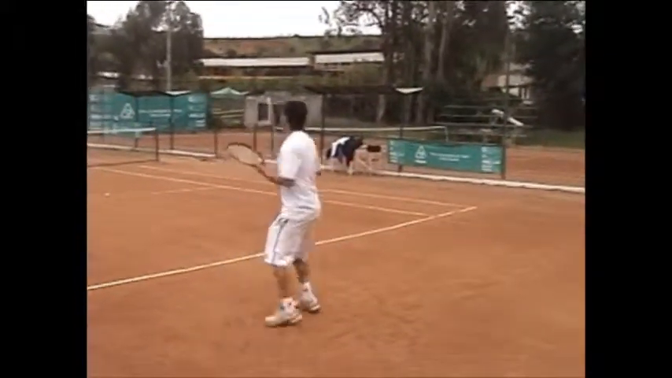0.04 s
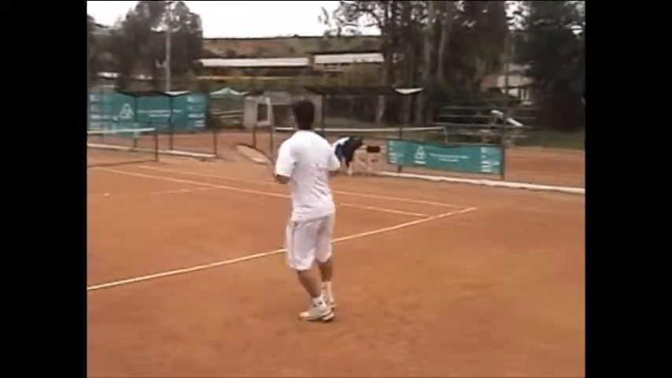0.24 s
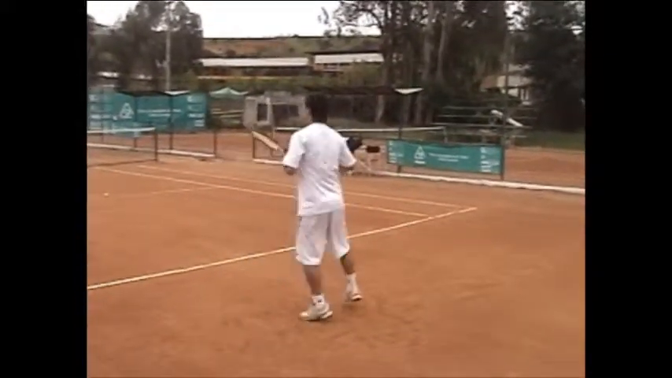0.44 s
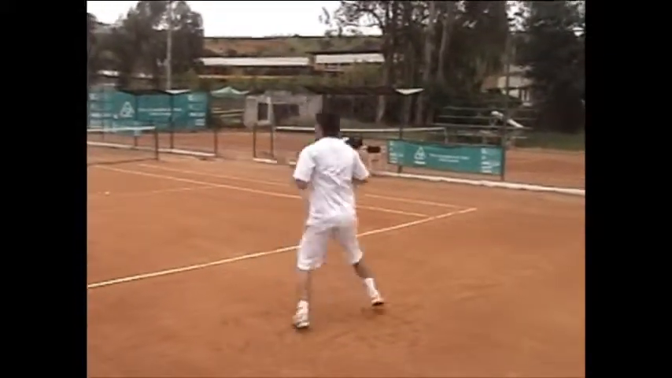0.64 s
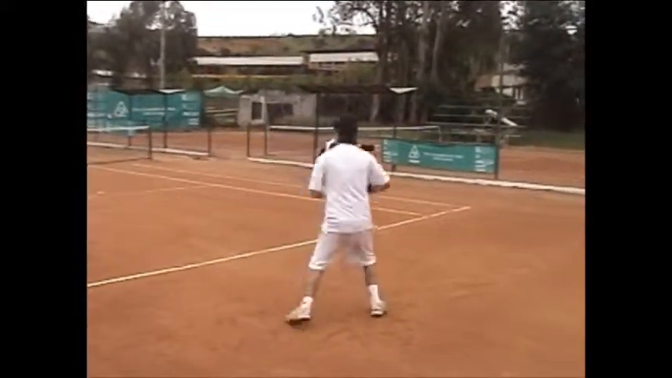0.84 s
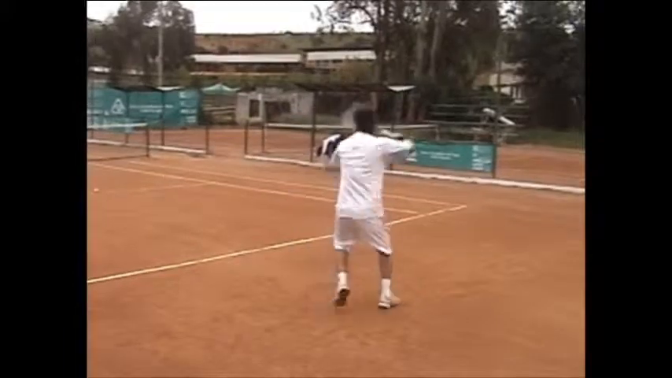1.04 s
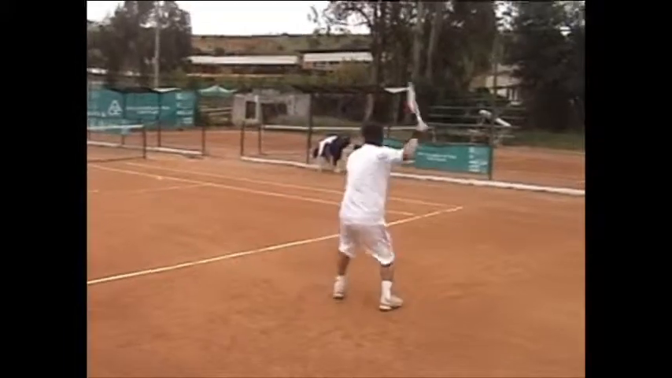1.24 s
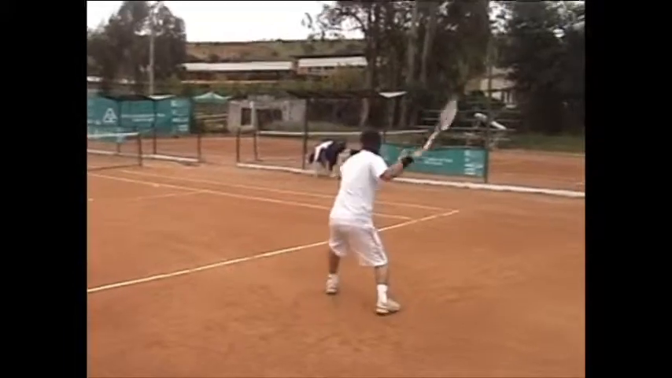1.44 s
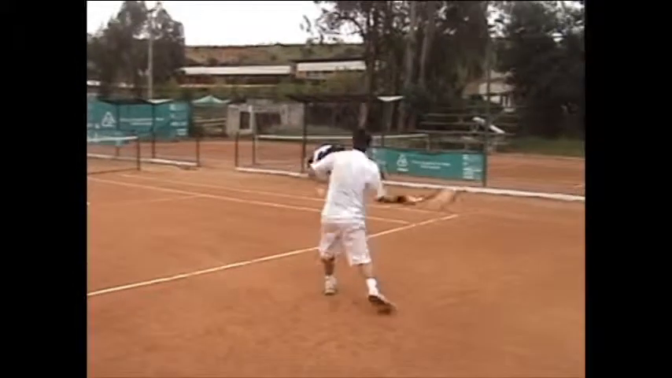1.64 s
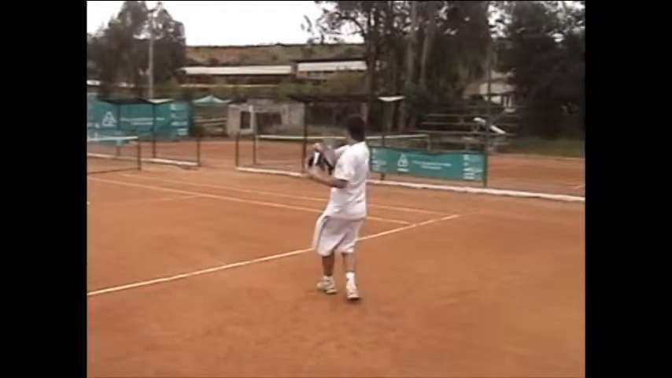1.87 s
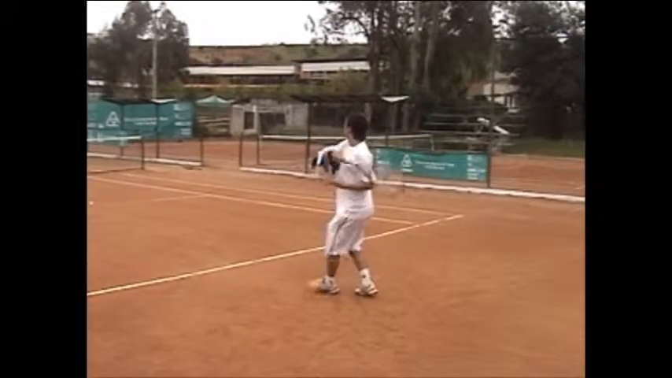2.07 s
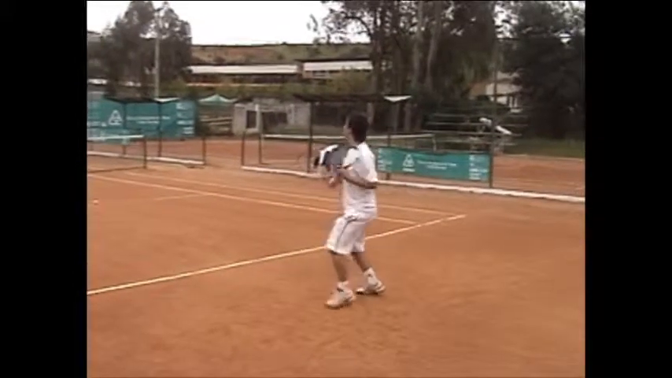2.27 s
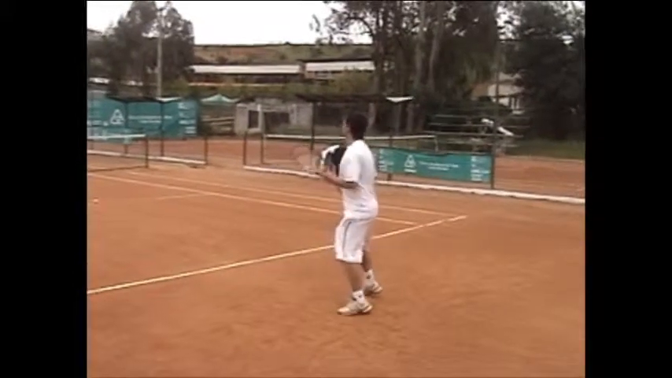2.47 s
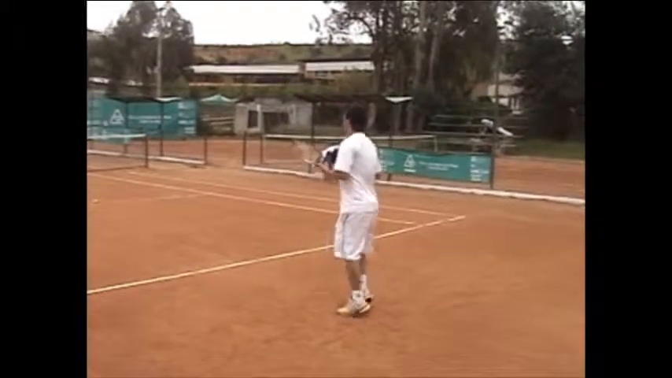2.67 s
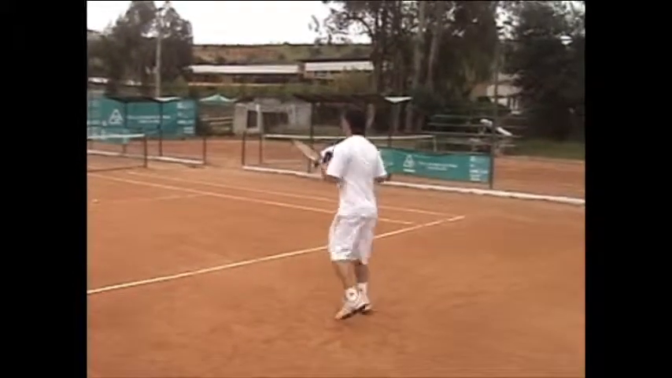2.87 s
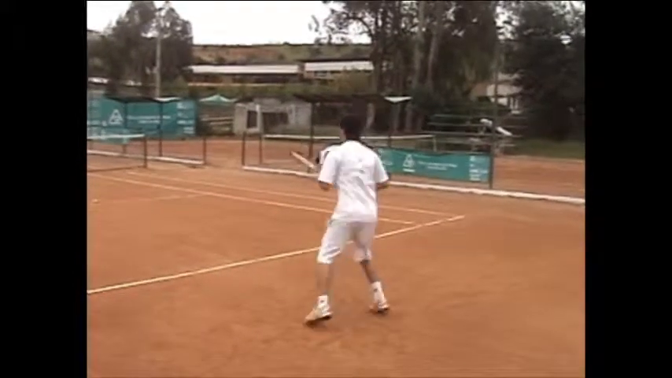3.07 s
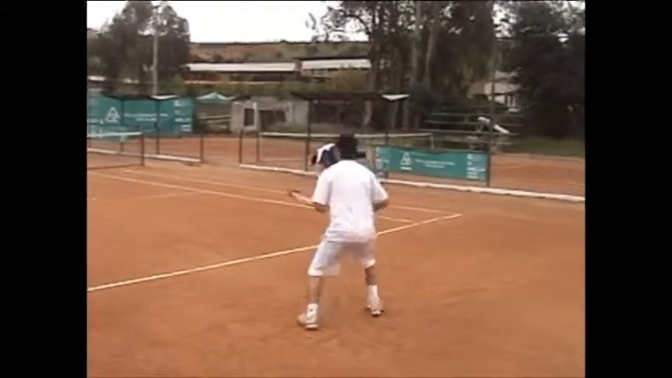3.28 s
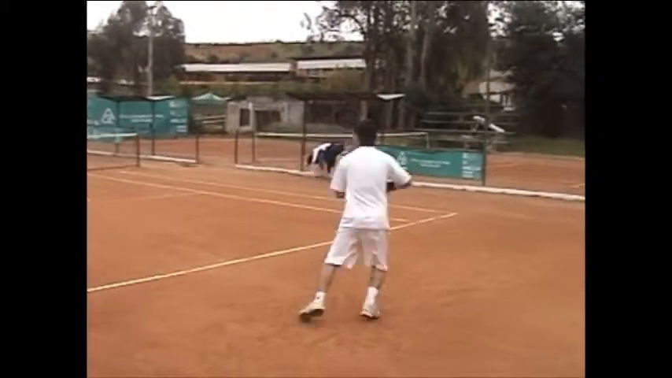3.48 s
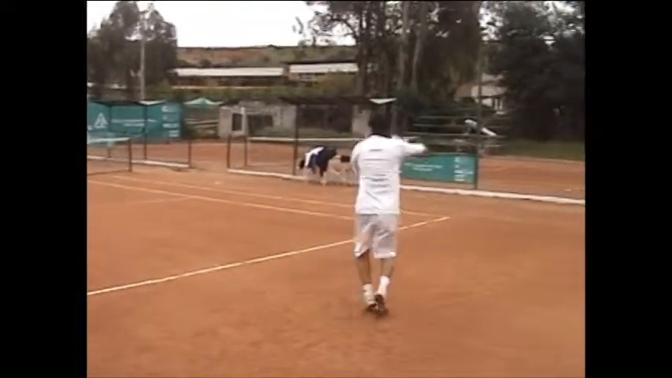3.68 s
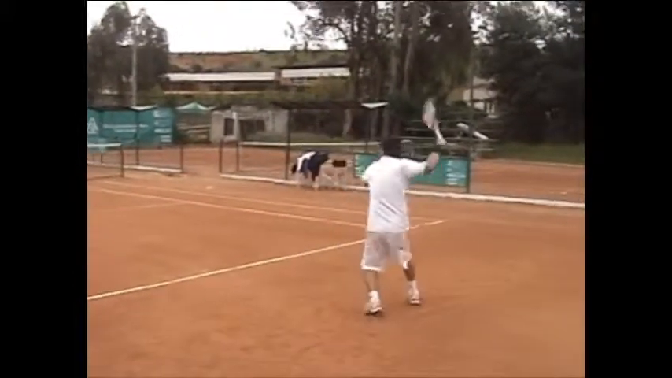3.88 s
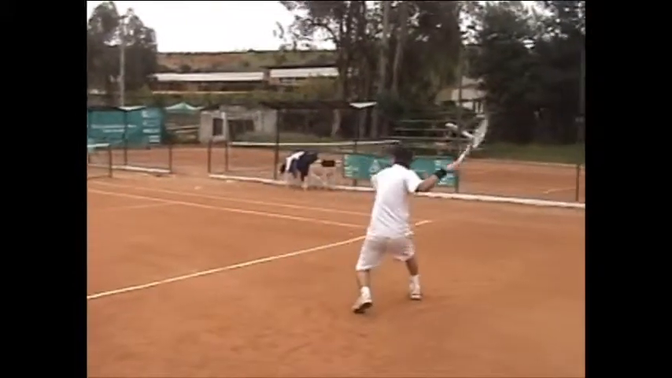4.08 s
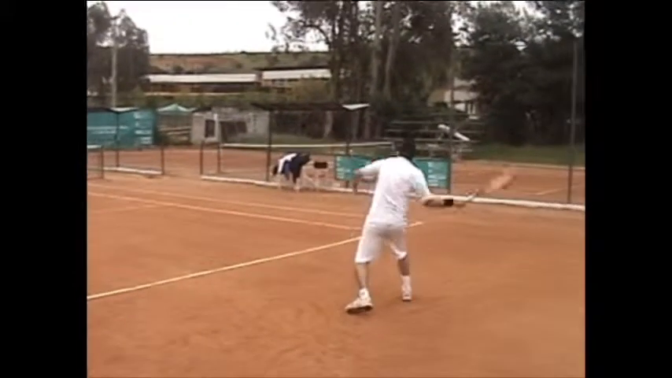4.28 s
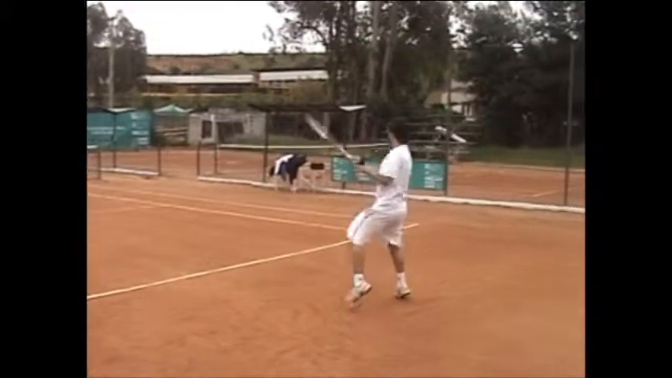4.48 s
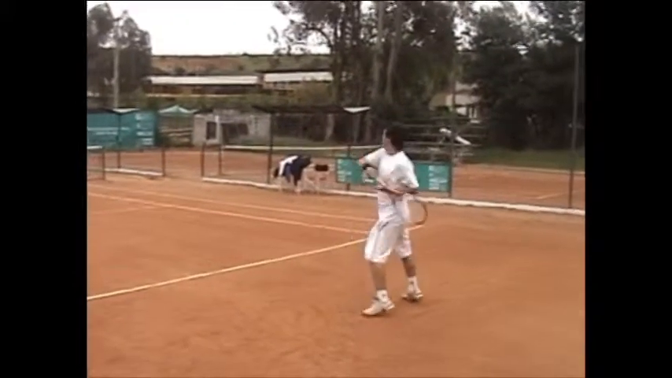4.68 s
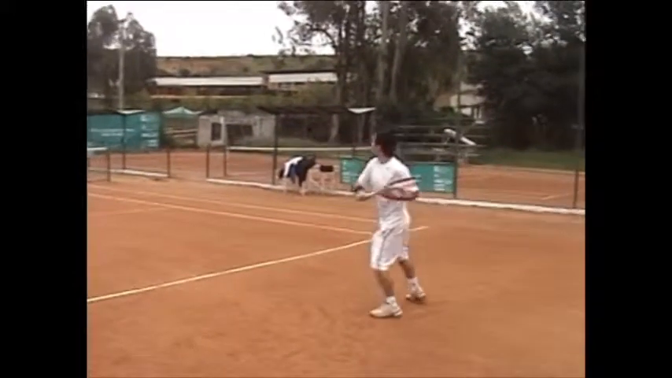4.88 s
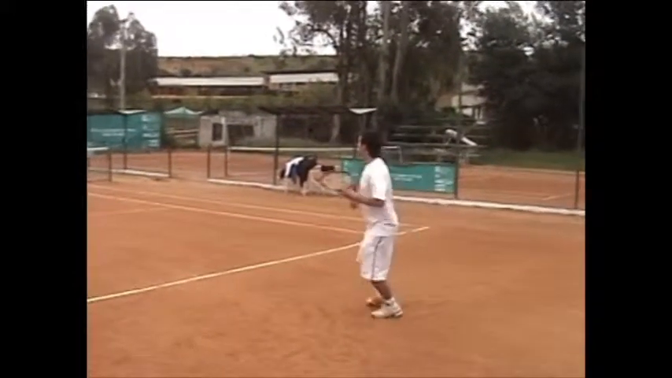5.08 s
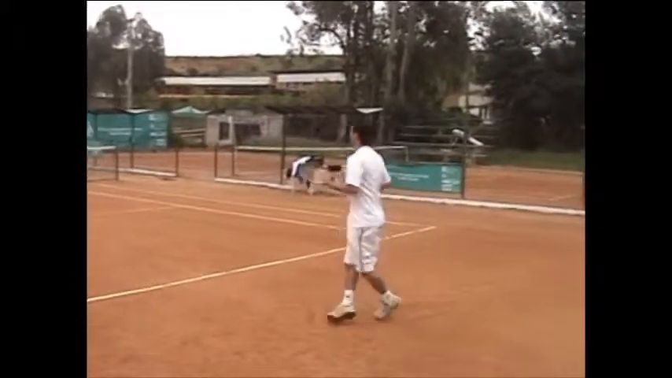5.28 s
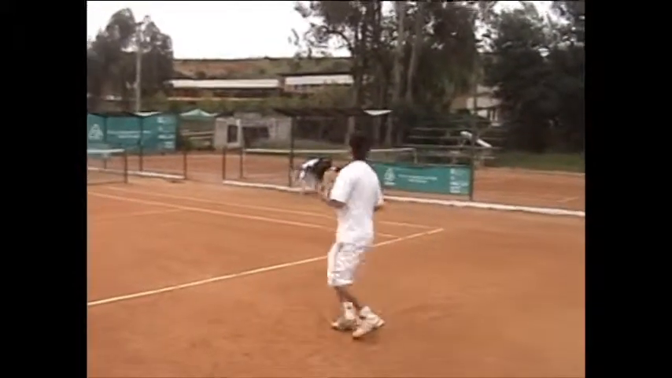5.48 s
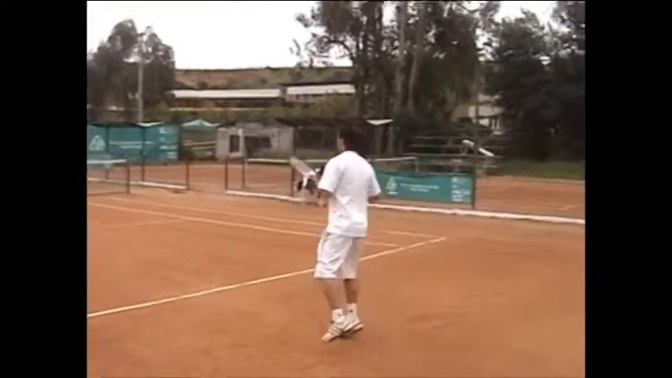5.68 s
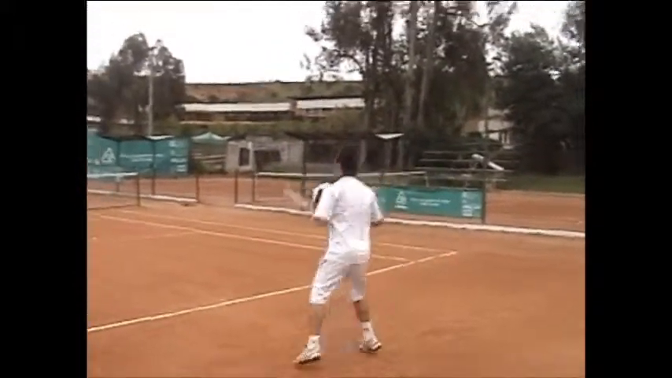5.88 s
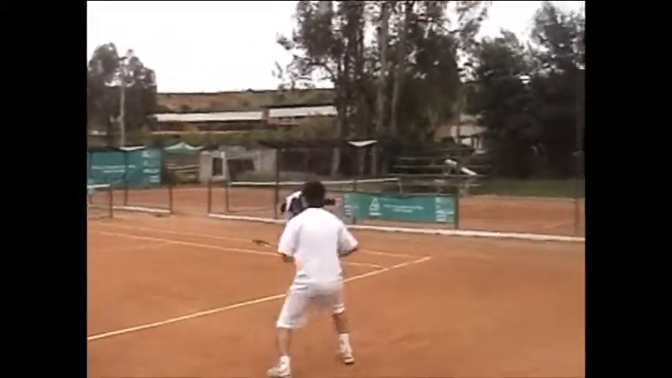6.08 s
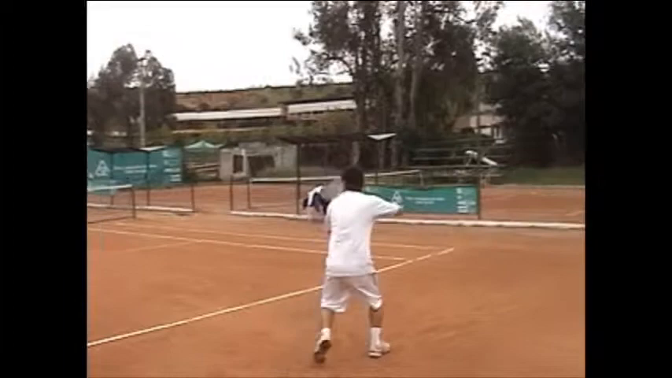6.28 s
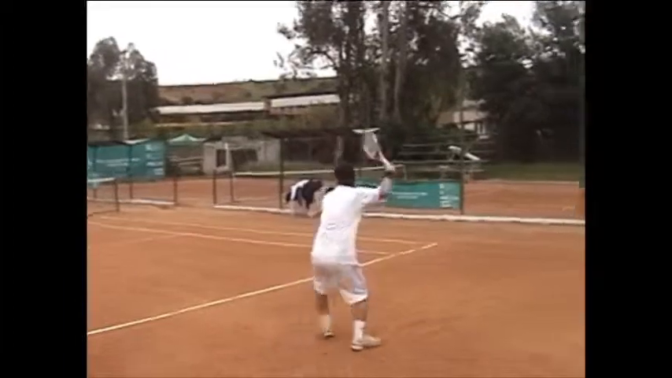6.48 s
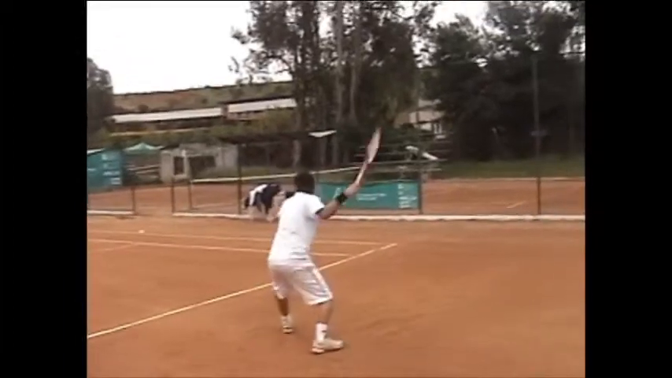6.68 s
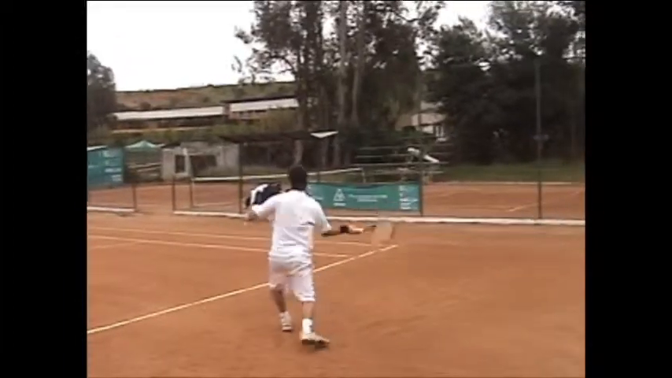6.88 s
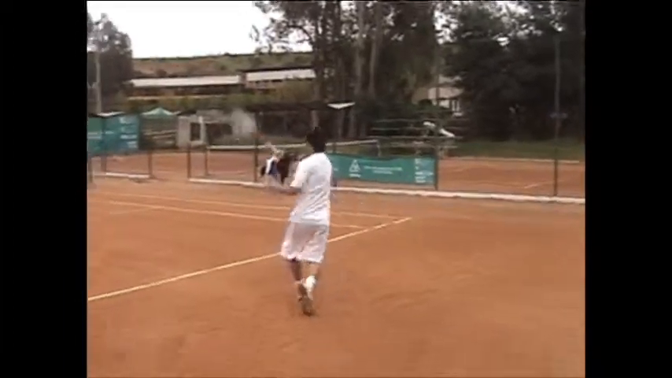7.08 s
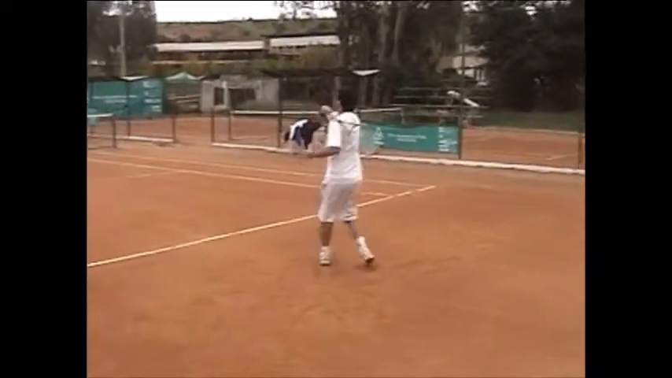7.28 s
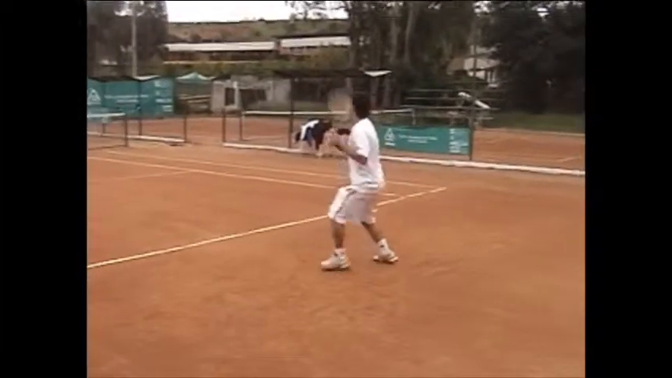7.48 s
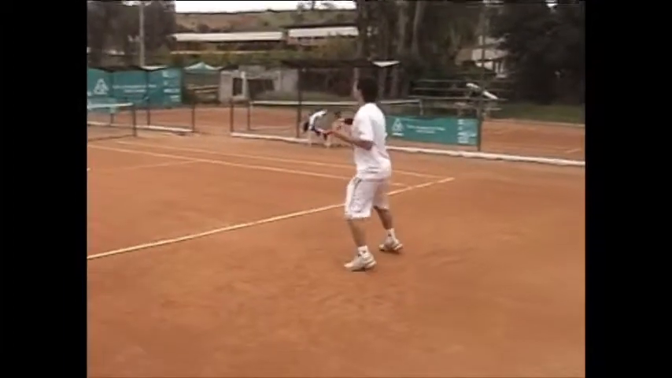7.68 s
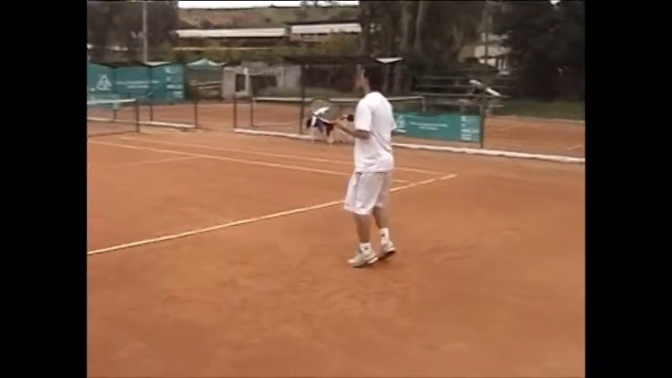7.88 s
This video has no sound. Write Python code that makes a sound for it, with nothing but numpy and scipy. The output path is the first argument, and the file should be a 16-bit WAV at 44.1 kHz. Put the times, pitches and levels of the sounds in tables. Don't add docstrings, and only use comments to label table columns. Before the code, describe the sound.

Open outdoor clay court, small stereo microphone behind the near player. Faint traffic hum, leaf rustle and slight wind run throughout; thin high bird chirps come from one side at 0.3-1.5 s. A far racket knocks at 0.6 s, short and woody with fence echo; the ball bounces and shoes scuff and crunch at 0.7-1.7. The near racket answers at 1.9 s, much louder, a hollow pop with crack, ringing strings and quick slap returns, over a bright gritty slide. Small steps and stone ticks follow. The softest far hit comes at 3.1, a scraping slide around 4.0, a near hit at 4.55. From 4.9 to 6 the bird sings louder, with a buzzy trill near 5.2. The hardest far hit lands at 5.9, then thuds, sharp stone clicks and sliding shoes around 6.6, and the strongest near hit at 7.1. Light footfalls and grit trail to about 8 s.

```python
import sys
import numpy as np
from scipy import signal
from scipy.fft import rfft, irfft
from scipy.io import wavfile
from scipy.ndimage import map_coordinates

SR = 44100
rng = np.random.default_rng(int(sys.argv[2]) if len(sys.argv) > 2 else 0)


def natural_amplitude(level_db):
    exponent = np.asarray(level_db, float) / 20
    return 10 ** exponent


def generate_wav(sig):
    pcm = np.round(np.clip(np.atleast_2d(sig).T, -1, 1) * 32767).astype(np.int16)
    wavfile.write(sys.argv[1], SR, pcm)


N = 349713

# (frequency [Hz], density [dB per Hz])
AIR_SPECTRUM = [(53, -32), (90, -16.5), (157, 0), (191, -7), (245, -2), (307, -8), (372, -11.5),
                (550, -11), (1000, -13.5), (1470, -16.5), (2420, -21.5), (5500, -25.5), (9600, -36),
                   (11000, -48.5), (14000, -47)]
# (frequency [Hz], correlation [0..1])
LIKENESS = [(60, 0.5), (180, 1), (540, 0.54), (1640, 0.38), (4950, 0.47), (14900, 0.75)]
# (frequency [Hz], density [dB per Hz])
WIND_SPECTRUM = [(20, -44), (35, -18), (49, 0), (62, -11), (90, -12), (130, -30), (300, -90)]
# (time [s], level [dB])
GUSTS = [(0.0, -52), (0.17, -59), (0.79, -58), (1.92, -63), (2.32, -56.5), (3.2, -52), (3.82, -61),
         (4.17, -52), (5.54, -59), (6.1, -55), (6.54, -48), (6.67, -58), (7.09, -51), (7.93, -57)]
TRAFFIC_DB = -41

# (start [s], level [dB])
PHRASES = [
    (0.345, 2),
    (4.879, 3),
]
# (offset [s], length [s], start [Hz], middle [Hz], end [Hz])
MOTIF = [
    (0, .05, 5350, 5800, 6550),
    (.004, .034, 6850, 7150, 7650),
    (.048, .042, 5150, 5600, 5950),
    (.088, .015, 5950, 5750, 5050),
]
MOTIF_DB, MOTIF_GAP_S, REPEAT_DB, REPEAT_RISE = [-58, -60, -55, -52], .152, 2.1, 1.045
# (middle [Hz], swing [Hz], level [dB])
TRILL = (3150, 380, -48.5)
TRILL_S, TRILL_PER_S, TRILL_STROKE_S, TRILL_CLIMB_HZ = 5.181, 72, .009, 10
# (offset [s], length [s], start [Hz], middle [Hz], end [Hz])
ARCH = [
    (-.004, .007, 3700, 4000, 4400),
    (.006, .012, 3150, 3900, 4550),
    (.023, .012, 4550, 3800, 2950),
]
ARCH_DB = [-6, 0, 1]
ARCH_RUNS, ARCH_SPACING_S = [(.934, -49), (5.498, -46)], .0568
LEVEL, ARCHED, DROP, PLUNGE = (1, 1, 1), (.66, 1, .69), (1.12, 1, .85), (1.32, 1, .84)
CREST, FALL, RISE, HOOK = (.93, 1, .82), (1.17, 1, .8), (.96, 1, 1.04), (.8, 1, .78)
# (time [s], length [s], middle [Hz], level [dB], shape)
NOTES = [(.148, .033, 2000, -53, LEVEL), (.876, .032, 5780, -45, PLUNGE), (1.399, .033, 5700, -37, PLUNGE),
         (.907, .05, 4900, -53, LEVEL), (1.43, .066, 4850, -47, LEVEL), (2.21, .06, 4900, -55, ARCHED),
         (4.952, .038, 3100, -50, FALL), (4.978, .21, 1455, -53, LEVEL), (5.569, .115, 1240, -48.5, LEVEL),
         (5.104, .022, 3800, -53, HOOK), (5.17, .008, 4500, -49, HOOK), (5.112, .024, 4250, -55, LEVEL),
         (5.088, .013, 2550, -52, RISE), (5.035, .016, 4300, -55, RISE), (1.344, .02, 3400, -44, RISE),
         (5.066, .02, 5000, -55, RISE), (5.104, .037, 6380, -49, CREST), (5.777, .035, 2550, -55, PLUNGE),
         (5.386, .034, 5680, -42, PLUNGE), (5.834, .014, 4300, -46, CREST), (5.87, .02, 3050, -52, CREST),
         (5.782, .01, 4150, -53, RISE), (.655, .008, 4100, -44, CREST), (.575, .04, 6450, -50, RISE),
         (5.964, .029, 5750, -40, PLUNGE), (5.99, .035, 4800, -48, LEVEL)]

# (time [s], length [s], hiss [dB], change along slide [dB], body over hiss [dB])
SLIDES = [(1.33, 0.058, -43, 3.5, 13), (1.478, 0.16, -47, 3.5, 13), (1.611, 0.12, -36, 0.5, -1),
          (1.976, 0.15, -34.5, -4, 1.5), (1.241, 0.033, -35, -1, 8), (0.725, 0.057, -46, -4, 7),
          (3.245, 0.016, -38.5, 2, 2), (6.48, 0.12, -38, -0.5, -5), (3.291, 0.044, -51.5, 6.5, 3.5),
          (3.924, 0.02, -38, 3.5, 4), (3.949, 0.031, -32, -2, 9), (3.991, 0.16, -29.5, -4, 6),
          (4.741, 0.063, -41.5, -1.5, -10), (5.93, 0.1, -42.5, -7.5, 6), (6.086, 0.053, -45.5, 3.5, 5),
          (6.164, 0.12, -49, 1.5, 5), (6.625, 0.35, -43.5, -8, 5), (7.055, 0.055, -47.5, 6, -3),
          (1.828, .048, -49, 3, -3), (4.163, .02, -42, -5, -3), (4.47, 0.085, -56, 9, -10),
          (7.472, 0.02, -35, 3, -9), (7.717, 0.071, -40.5, -3.5, 4), (7.804, 0.11, -61, 9.5, 15.5)]
# (time [s], length [s], hiss [dB], body over hiss [dB])
LANDINGS = [(0.292, 0.029, -37, -6), (0.71, 0.12, -39.5, 9.5), (1.162, 0.021, -29.5, 7),
            (1.171, 0.076, -29.5, 5), (1.282, 0.094, -40, 12.5), (2.146, 0.077, -43.5, 3),
            (3.211, 0.0088, -32.5, -4), (1.404, 0.061, -37.5, 11.5), (1.901, 0.084, -25, 4),
            (2.493, 0.04, -37.5, 1.5), (2.818, 0.029, -44.5, 5), (3.532, 0.018, -29.5, -1.5),
            (3.734, 0.037, -46, -19), (3.842, 0.15, -42, -3.5), (4.638, 0.04, -45, 8.5),
            (5.426, 0.057, -37, 4.5), (6.046, 0.033, -35, -2), (6.257, 0.06, -39, -11),
            (6.515, 0.058, -33, -12), (7.183, 0.038, -38, -7), (7.501, 0.073, -43.5, 2.5)]
# (time [s], length [s], hiss at end [dB], body over hiss [dB])
PUSHES = [(0.984, 0.06, -39, -21), (1.087, 0.0096, -32.5, -5), (1.764, 0.053, -36, -22),
          (1.78, 0.013, -42, -20), (3.209, 0.03, -54, 14), (3.373, 0.032, -40, -17),
          (3.569, 0.066, -42, -9), (6.353, 0.04, -39, -21), (6.437, 0.033, -45, -6),
          (6.825, 0.12, -43.5, 7.5), (6.939, 0.11, -34.5, -31), (6.94, 0.037, -36, -25),
          (7.381, 0.08, -43, 2)]
LANDING_FADE_DB, PUSH_SWELL_DB = -11, 11.5
CONTACT_S, LIFT_S, PUSH_LIFT_S = 0.0058, 0.024, 0.009
# (frequency [Hz], density [dB per Hz])
GRIT_SPECTRUM = [(1180, -1.5), (2000, 0.5), (2910, -4.5), (3600, 2), (9600, -9), (10800, -24.5),
                 (13600, -21), (14600, -44)]
# (frequency [Hz], density [dB per Hz])
SCRAPE_SPECTRUM = [(200, -29), (330, -9.5), (480, -2), (840, -4), (1600, -4.5), (2700, -10), (5500, -21.5),
                   (9000, -49)]
# (time [s], centre [Hz])
SOLE = [
    [(0.71, 660), (0.735, 1500), (0.774, 905), (0.8, 670), (0.83, 666)],
    [(1.16, 1430), (1.214, 1060), (1.276, 1490), (1.322, 870), (1.396, 670), (1.646, 900), (1.75, 1220)],
    [(1.93, 771), (1.942, 811), (1.968, 1150), (2.036, 1100), (2.068, 977), (2.116, 1120), (2.17, 771)],
    [(3.93, 1560), (4.0, 940), (4.018, 900), (4.054, 1010), (4.09, 880), (4.17, 1050)],
    [(6.46, 795), (6.528, 1500), (6.576, 788), (6.706, 880), (6.752, 788), (6.86, 1140), (6.95, 1050)],
]
SOLE_BANDS_HZ, SOLE_FOCUS_DB = [600, 805, 1190, 1750], 4.5
CLUMP_DB = 3.2

# (time [s], force [dB], strings [dB], side fence [dB], left-right [dB])
FAR_BLOWS = [
    (.5952, -4.5, -17.5, 9, 5.2),
    (3.1287, -5.5, -20.5, -10, 6.4),
    (5.9114, -2, -14, -14, 5.3),
]
# (time [s], force [dB], strings [dB], side fence [dB], left-right [dB])
NEAR_BLOWS = [
    (1.8806, -5, -21.5, -6.5, 2.5),
    (4.5506, -4, -20, -26, 1.5),
    (7.1087, -2.5, -16.5, -8, 3),
]
# (frequency [Hz], t60 [s], delay after contact [s])
FAR_MODES = [(867, 0.017, 0.00305), (1494, 0.034, 0.00357), (2870, 0.016, 0.00146), (996, 0.054, 0.00378),
             (784, .02, 0.0071)]
# (frequency [Hz], t60 [s], delay after contact [s])
NEAR_MODES = [(820, 0.026, 0.00118), (1643, 0.084, 0.0092), (1663, 0.16, 0.014), (1050, 0.059, 0.0027),
              (1613, 0.17, 0.0083)]
# (frequency [Hz], t60 [s], level re ball push [dB])
LESSER_MODES = [(268, 0.042, -7.5), (470, 0.039, -22), (595, 0.018, -0.5), (1055, 0.024, -6),
                (1235, 0.038, -22), (2170, 0.0019, 12.5), (3530, 0.028, -22)]
# (frequency [Hz], delay [s], level re frame [dB])
FAR_REBOUNDS = [(276, 0.0014, -10), (700, 0.0041, -3), (232, 0.00076, -11.5)]
# (frequency [Hz], delay [s], level re frame [dB])
NEAR_REBOUNDS = [(1060, .003, -5), (830, .0105, -4), (800, .0095, -10)]
# (delay [s], level re blow [dB], left-right [dB], polarity)
FAR_WALLS = [(.01, -34, -2, 1), (0.0183, -35, -1, -0.61), (0.029, -12.5, -3, 0.87), (.0375, -20, 2, 1),
             (0.067, -9, 3, -0.85)]
# (delay [s], level re blow [dB], left-right [dB], polarity)
NEAR_WALLS = [(.0045, 2, -2, 0.76), (.009, -45, -7, 1), (0.024, 9, 4, 0.97), (0.0332, 1, -2, -0.92),
              (.049, -15, 2, 1), (.099, -15.5, 4, 0.83), (0.128, -20.5, 3, 1)]
SIDE_FENCE = 2
NEAR_REACH, FAR_REACH = [1.003, 1.008, .988], [1.001, 1.007, .999]
NEAR_PUSH, FAR_PUSH = (234.6, 0.0103), (445, 0.0033)
STRING_FLUTTER_DB, FLUTTER_S, STRING_SIDE_DB = 3.5, .004, -5.5
RIM_T60_S, RIM_DB = 0.069, -16
CRACK_HOLD_S, REBOUND_T60_S = 0.0016, 0.019
OPEN_COURT_DB = -9

# (time [s], peak [dB], centre [Hz])
TICKS = [(0.716, -25, 2280), (0.8605, -28, 7000), (.734, -22, 2250), (.742, -28, 4500), (.79, -23, 2000),
         (.786, -32, 6000), (1.074, -29, 3330), (1.0983, -15, 2560), (1.627, -25, 1770),
         (2.2818, -22.5, 1530), (2.3193, -28, 1580), (2.3562, -20.5, 1280), (2.4857, -28, 2150),
         (2.754, -27, 1370), (3.2093, -21, 1410), (3.3858, -20, 2300), (3.841, -20.5, 1600),
         (3.8886, -20.5, 1610), (3.9488, -24, 1210), (4.425, -27, 1270), (4.435, -25, 1350),
         (6.024, -20, 1350), (6.053, -30, 1490), (6.196, -23, 1230), (6.2627, -23, 2070),
         (6.323, -27, 1220), (6.3668, -19, 1620), (6.5385, -13, 2150), (6.593, -10, 1850),
         (6.6498, -18.5, 1320), (6.6925, -18.5, 1510)]
# (time [s], peak [dB], centre [Hz])
SNAPS = [(1.088, -23, 3430), (1.107, -20, 4140), (1.1774, -12, 1570), (1.1924, -17, 1560),
         (1.673, -16, 1860), (1.729, -18, 1840), (2.5624, -30, 2020), (3.245, -34, 4200),
         (3.2694, -20, 1780), (3.528, -26, 1800), (3.9784, -18, 1710), (6.0557, -23, 4500),
         (6.058, -20, 4800), (1.925, -22, 6000), (1.952, -13, 8000), (1.964, -14, 8000), (1.975, -21, 9000),
         (1.989, -22, 7000), (2.023, -30, 9500), (7.182, -36, 8500), (7.201, -34, 7000), (7.207, -35, 7000),
         (3.5255, -20, 4200), (1.269, -21, 1900), (1.228, -25, 1700), (1.724, -15.5, 7500),
         (7.036, -15, 5000), (.81, -19, 900), (3.95, -13, 2500), (3.988, -25, 4000), (4.049, -19, 3500),
         (1.2478, -13, 1600), (1.514, -29, 1500), (1.56, -24, 1200), (1.591, -27, 1200),
         (6.0745, -19, 2020), (6.577, -22, 1860), (6.6122, -20, 1790), (6.625, -20, 1650),
         (6.639, -21, 1610), (6.7074, -30, 1820), (7.1794, -26, 1660), (7.4397, -24, 1560),
         (7.472, -18, 1550), (7.7165, -16.5, 3800), (7.869, -17.5, 1800), (7.914, -23, 1780),
         (7.9224, -27, 1540)]
TICK_T60_S, SNAP_T60_S = 0.0065, .0035

# (time [s], peak [dB], pitch [Hz], ring [cycles], left-right
# [dB])
THUDS = [(0.808, -25.5, 730, 2.9, 11), (0.86, -27, 218, 2.1, -1), (2.756, -32, 620, 2.5, 1.5),
         (3.243, -26, 260, 1.6, 1), (7.375, -28, 900, 2.6, 6), (1.368, -21, 203, 2.4, 2),
         (1.388, -32, 600, 10, 0), (2.064, -19, 820, 2.5, 5), (2.619, -32, 61.9, 1.5, 1.5),
         (3.208, -26, 236, 2.7, 1), (3.336, -22, 312, 1.3, 5), (3.994, -23.5, 235, 3.7, 2),
         (4.157, -29.5, 109, 3.4, -3.5), (4.731, -32.5, 600, 3.9, 6), (4.815, -35, 347, 3.4, 0.5),
         (5.291, -46, 315, 3.3, 0.0), (5.385, -18.5, 227, 0.64, 3), (5.423, -30.5, 183, 2.9, 2),
         (6.592, -26.5, 685, 3.9, 13), (6.647, -18, 970, 2.3, 7), (5.89, -22, 372, 1.5, 6),
         (6.024, -25, 326, 2.6, 2), (6.073, -23, 111, 1.45, 2), (6.120, -23, 564, 1.9, 8),
         (6.575, -31, 610, 4.9, 2), (6.646, -17, 253, 2.04, 2.5), (7.289, -26, 825, 3.8, 7),
         (7.626, -25.5, 634, 0.92, 15), (3.35, -34, 700, 2.8, 5), (6.13, -26, 760, 2.8, 10)]


def in_time(rows):
    s, *columns = np.transpose(rows)
    return [np.interp(np.arange(N) / SR, s, c) for c in columns]


def at_hz(points):
    hz, value = np.transpose(points)
    return np.interp(np.log(np.arange(N // 2 + 1) * SR / N + 1), np.log(hz), value)


def coloured(x, spectrum):
    y = irfft(rfft(x) * natural_amplitude(at_hz(spectrum)), N)
    return y / np.sqrt(np.mean(y ** 2))


def drift(rate_hz):
    knots = rng.standard_normal(800)
    return map_coordinates(knots, [np.arange(N) * (rate_hz / SR)], order=3, mode="wrap")


def pan(x, db):
    return x * natural_amplitude(np.array([[db / 2], [-db / 2]]))


def add(out, x, s):
    i = int(round(s * SR))
    out[:, i:i + x.shape[-1]] += x[..., :N - i]


def low(x, hz, order=2):
    return signal.sosfilt(signal.butter(order, hz, fs=SR, output="sos"), x)


def band(x, edges_hz, order):
    return signal.sosfilt(signal.butter(order, edges_hz, "band", fs=SR, output="sos"), x)


def ring(hz, t60_s, rise_s, late_s=0):
    t = np.maximum(np.arange(4000) / SR - late_s, 0)
    return -np.sin(2 * np.pi * hz * t) * natural_amplitude(-60 * t / t60_s) * (1 - np.exp(-t / rise_s))


def air():
    wind_db, = in_time(GUSTS)
    alike = np.clip(at_hz(LIKENESS), 0, 1)
    mid, side = rfft(rng.standard_normal((2, N)))
    stereo = np.sqrt(1 + alike) * mid + np.sqrt(1 - alike) * side * [[1], [-1]]
    hum = coloured(irfft(stereo, N), AIR_SPECTRUM)
    wind = coloured(rng.standard_normal(N) + 0.13 * rng.standard_normal((2, N)), WIND_SPECTRUM)
    lumps_db, sway_db = 2.5 * drift(6), 1.3 * drift(9)
    hum = natural_amplitude(TRAFFIC_DB + sway_db) * low(hum, 18000)
    return hum + natural_amplitude(wind_db + 2.0 + lumps_db) * pan(wind, -1.7)


def whistle(length_s, start_hz, middle_hz, end_hz, db):
    u = np.linspace(0, 1, int(length_s * SR))
    hz = np.polyval(np.polyfit([0, .5, 1], [start_hz, middle_hz, end_hz], 2), u)
    flutter_db = np.interp(u * length_s / .005, np.arange(60), rng.normal(0, 3, 60))
    return natural_amplitude(db + flutter_db) * np.sqrt(np.sin(np.pi * u)) * np.sin(2 * np.pi * np.cumsum(hz) / SR)


def birds():
    notes = []
    for s, db in PHRASES:
        for k in range(2):
            for (at_s, length_s, *hz), stroke_db in zip(MOTIF, MOTIF_DB):
                pitches = np.array(hz) * REPEAT_RISE ** k
                notes.append((s + k * MOTIF_GAP_S + at_s, length_s, *pitches, db + stroke_db + k * REPEAT_DB))
    for s, db in ARCH_RUNS:
        for k in range(5):
            for (at_s, *stroke), stroke_db in zip(ARCH, ARCH_DB):
                notes.append((s + k * ARCH_SPACING_S + at_s, *stroke, db + stroke_db))
    middle_hz, swing_hz, db = TRILL
    for k in range(13):
        s = TRILL_S + (k + rng.normal(0, 0.14)) / TRILL_PER_S
        pitches = middle_hz + TRILL_CLIMB_HZ * k + swing_hz * np.array([1, 0, -1]) + rng.normal(0, 99)
        notes.append((s, TRILL_STROKE_S, *pitches, db))
    notes += [(s, length_s, *(hz * np.array(shape)), db) for s, length_s, hz, db, shape in NOTES]
    out = np.zeros((2, N))
    for s, *note in notes:
        add(out, pan(whistle(*note), 7.8), s)
    return out


def shoe_pressure():
    moves = [(*slide, LIFT_S) for slide in SLIDES]
    moves += [(s, length_s, db, LANDING_FADE_DB, over_db, LIFT_S) for s, length_s, db, over_db in LANDINGS]
    moves += [(s, length_s, db - PUSH_SWELL_DB, PUSH_SWELL_DB, over_db, PUSH_LIFT_S)
              for s, length_s, db, over_db in PUSHES]
    hiss, body, t = np.zeros(N), np.zeros(N), np.arange(N) / SR
    for s, length_s, db, change_db, over_db, lift_s in moves:
        on = np.interp(t, [s - CONTACT_S, s, s + length_s, s + length_s + lift_s], [0, 1, 1, 0])
        pressure = on * natural_amplitude(db + change_db * np.clip((t - s) / length_s, 0, 1))
        hiss = np.hypot(hiss, pressure)
        body = np.hypot(body, pressure * natural_amplitude(over_db))
    return hiss, body


def sole(scrape):
    sole_hz, = in_time([point for slide in SOLE for point in slide])
    under = [0]
    for hz in SOLE_BANDS_HZ:
        under.append(signal.sosfiltfilt(signal.butter(2, hz, fs=SR, output="sos"), scrape))
    under.append(scrape)
    centres_hz = 0.85 * np.array(SOLE_BANDS_HZ + [1.26 * SOLE_BANDS_HZ[-1]])
    out = 0
    for hz, below, above in zip(centres_hz, under, under[1:]):
        focus_db = -SOLE_FOCUS_DB * np.log2(hz / sole_hz) ** 2
        out = out + natural_amplitude(CLUMP_DB * drift(40) + focus_db + 1.0) * (above - below)
    return out


def shoes(spread_db, crunch_db, wide):
    hiss, body = shoe_pressure()
    sizes = np.minimum(rng.exponential(1, (2, 1, N)), 3.2)
    grains = rng.standard_normal((2, 3, N)) * natural_amplitude(spread_db * sizes)
    fine, coarse = grains[:, :1] + np.reshape(wide, (2, 1, 1)) * grains[:, 1:]
    crunch = natural_amplitude(crunch_db * drift(70))
    scrape = sole(coloured(coarse, SCRAPE_SPECTRUM))
    return crunch * (hiss * coloured(fine, GRIT_SPECTRUM) + body * scrape)


def squash(hz, length_s):
    t = np.arange(4000) / SR
    return -np.sin(2 * np.pi * hz * t) * np.sin(np.pi * np.minimum(t / length_s, 1))


def string_ring(string_db, modes, rise_s):
    knots = rng.standard_normal((4, 30))
    out = 0
    for db, turns, (hz, t60_s, late_s) in zip([-5.0, -0.5, -2.0, -6], knots, modes):
        sway = np.interp(np.arange(4000) / SR / FLUTTER_S, np.arange(30), turns)
        out = out + natural_amplitude(string_db + db + STRING_FLUTTER_DB * sway) * ring(hz, t60_s, rise_s, late_s)
    return out


def lesser_ring(level_db, rise_s):
    out = 0
    for (hz, t60_s, db), (size, late) in zip(LESSER_MODES, rng.random((len(LESSER_MODES), 2))):
        out = out + natural_amplitude(level_db + db + 9.1 * size) * ring(hz, t60_s, rise_s, 0.000858 + 0.003914 * late)
    return out


def contact_crack(db, hz, t60_s):
    t = np.arange(4000) / SR
    noise = rng.standard_normal((2, 4001)) * 0.29 + rng.standard_normal(4001)
    burst = np.diff(low(noise, hz, order=3))
    fade = natural_amplitude(-60 * np.maximum(t - CRACK_HOLD_S, 0) / t60_s)
    return natural_amplitude(db) * burst / np.std(burst) * fade * np.minimum(t / 0.00077, 1)


def scattered(tail_db, tail_t60_s, fence_s):
    t = np.arange(SR * 3 // 4) / SR
    shared, own = rng.standard_normal(len(t)), rng.standard_normal((2, len(t)))
    lumps = natural_amplitude(3.16 * rng.standard_normal(len(t) // 175).repeat(175))
    dying = natural_amplitude(-60 * t / tail_t60_s) + natural_amplitude(-18.5 - 60 * t / 0.95)
    sparse = natural_amplitude(OPEN_COURT_DB * np.clip((fence_s - t) / 0.0027, 0, 1))
    tail = (shared + .5 * own) * lumps * natural_amplitude(tail_db) * dying * np.clip(t / 0.0033, 0, 1) * sparse
    bright = band(tail * natural_amplitude(-60 * t / 2.1), [1300, 5500], 2)
    return tail, bright


def rackets(blows, reaches, walls, push, modes, rebounds, return_push, frame_db, crack_db, lesser_db, rise_s,
            crack_t60_s, crack_hz, rim_hz, wall_hz, blur_t60_s, tail_db, tail_t60_s, fence_s):
    out, t = np.zeros((2, N)), np.arange(4000) / SR
    (frame_hz, frame_t60_s, frame_late_s), *string_modes = modes
    for (s, push_db, string_db, fence_db, pan_db), reach, swing in zip(blows, reaches, rebounds):
        swing_hz, swing_late_s, swing_db = swing
        blow = natural_amplitude(push_db) * squash(*push)
        blow = blow + natural_amplitude(push_db + frame_db) * ring(frame_hz, frame_t60_s, rise_s, frame_late_s)
        blow = blow + natural_amplitude(crack_db + RIM_DB) * ring(rim_hz, RIM_T60_S, rise_s, 0.003)
        blow = blow + lesser_ring(push_db + lesser_db, rise_s)
        strings = string_ring(string_db, string_modes, rise_s)
        crack = contact_crack(crack_db, crack_hz, crack_t60_s)
        rebound = natural_amplitude(push_db + frame_db + swing_db) * ring(swing_hz, REBOUND_T60_S, rise_s, swing_late_s)
        add(out, pan(blow + crack + rebound, pan_db) + pan(strings, pan_db + STRING_SIDE_DB), s)

        front = low((blow + strings) * natural_amplitude(-60 * t / blur_t60_s), wall_hz)
        echo = 0.12 * front + 0.78 * natural_amplitude(push_db) * squash(*return_push)
        for k, (delay_s, back_db, back_pan_db, polarity) in enumerate(walls):
            level_db = back_db + fence_db * (k == SIDE_FENCE)
            add(out, pan(natural_amplitude(level_db) * polarity * echo, back_pan_db), s + reach * delay_s)

        tail, bright = scattered(tail_db, tail_t60_s, fence_s)
        add(out, signal.fftconvolve(tail, (front + 0.71 * echo)[None, :700], axes=1), s)
        add(out, natural_amplitude(crack_db + 20.5) * bright, s)
    return out


def far_racket():
    return rackets(FAR_BLOWS, FAR_REACH, FAR_WALLS, FAR_PUSH, FAR_MODES, FAR_REBOUNDS, return_push=FAR_PUSH,
                   frame_db=0.5, crack_db=-26, lesser_db=-6.5, rise_s=0.0011,
                   crack_t60_s=0.011, crack_hz=6500, rim_hz=3620, wall_hz=1620, blur_t60_s=0.45,
                   tail_db=-32.0, tail_t60_s=0.14, fence_s=0.0073)


def near_racket():
    return rackets(NEAR_BLOWS, NEAR_REACH, NEAR_WALLS, NEAR_PUSH, NEAR_MODES, NEAR_REBOUNDS,
                   return_push=(390, .0042), frame_db=6.5, crack_db=-9.5, lesser_db=-1.5, rise_s=0.0005,
                   crack_t60_s=0.018, crack_hz=5100, rim_hz=3980, wall_hz=2020, blur_t60_s=0.02,
                   tail_db=-22.5, tail_t60_s=0.098, fence_s=0.02)


def stones():
    out, t = np.zeros((2, N)), np.arange(3000) / SR
    hits = [(*tick, TICK_T60_S) for tick in TICKS] + [(*snap, SNAP_T60_S) for snap in SNAPS]
    for s, db, hz, t60_s in hits:
        noise = rng.standard_normal(3000) + 0.57 * rng.standard_normal((2, 3000))
        burst = band(noise, [.5 * hz, 1.35 * hz], 1)
        burst = low(burst, 7900, order=1) * natural_amplitude(-60 * t / t60_s)
        add(out, natural_amplitude(db - 2.0) * burst / np.abs(burst).max(), s)
    return out


def thuds():
    out, t = np.zeros((2, N)), np.arange(4000) / SR
    for s, db, hz, cycles, pan_db in THUDS:
        puff = natural_amplitude(-10.5) * low(rng.standard_normal(4000), 2.0 * hz) * natural_amplitude(-60 * t / 0.018)
        body = ring(hz, 2 * cycles / hz, 0.77 / hz)
        add(out, pan(natural_amplitude(db + 13.0) * (body + puff), pan_db), s)
    return out


def scene():
    blows = far_racket() + near_racket()
    high_pass = signal.butter(2, 110, "high", fs=SR, output="sos")
    knocks = signal.sosfilt(high_pass, blows)
    grit = shoes(spread_db=7.0, crunch_db=0.88, wide=[.18, .3])
    return air() + birds() + grit + knocks + stones() + thuds()


def low_pass(x):
    return signal.sosfilt(signal.butter(12, 15500, fs=SR, output="sos"), x)


def record(dry):
    rounded = 1.056 * np.tanh(dry / 1.274)
    return low_pass(low(rounded, 13400, order=10))


dry = scene()
out = record(dry)
generate_wav(out)
```